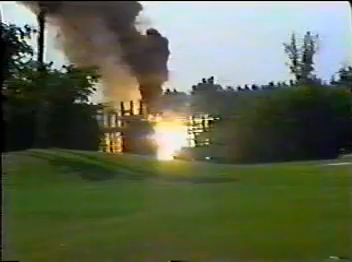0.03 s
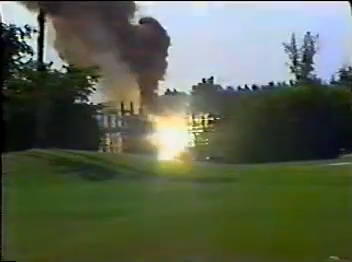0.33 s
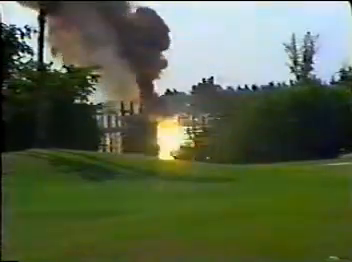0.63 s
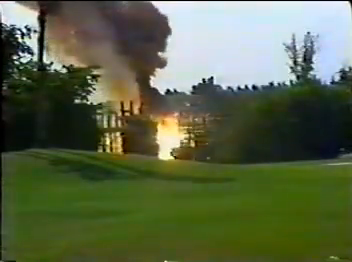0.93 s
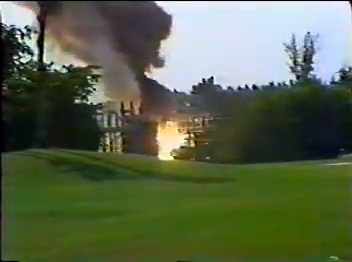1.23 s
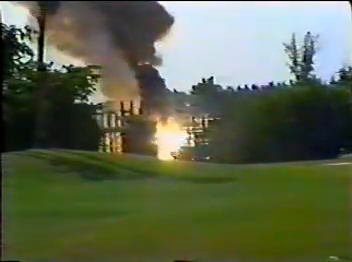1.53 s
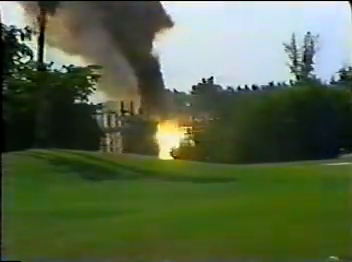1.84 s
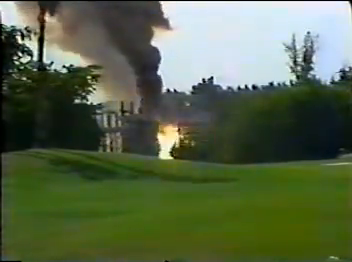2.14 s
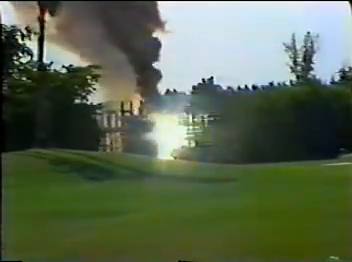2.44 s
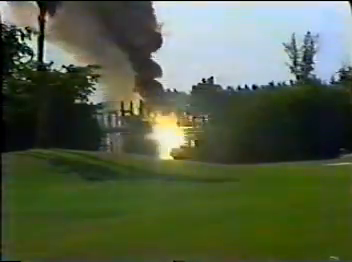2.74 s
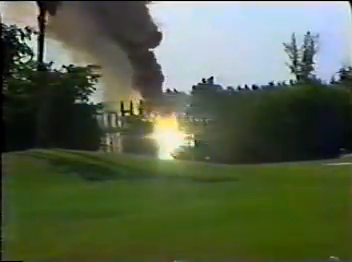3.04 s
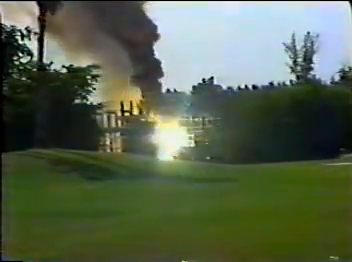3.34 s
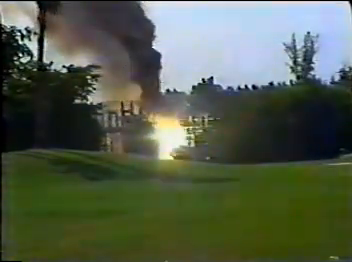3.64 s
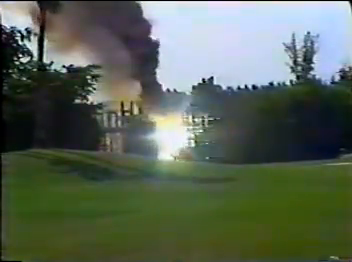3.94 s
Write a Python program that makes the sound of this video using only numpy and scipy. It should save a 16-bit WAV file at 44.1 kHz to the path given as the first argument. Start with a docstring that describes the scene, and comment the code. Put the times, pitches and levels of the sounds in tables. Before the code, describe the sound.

Loud electrical arcing buzzes and sizzles in a burning substation, with a few sparks snapping.

```python
"""A loud electric hum starts abruptly, with a ragged roar and sizzle that pulse along with it.
It is a power arc burning in a substation across a lawn, striking twice in every mains cycle.
Hot gas rumbles underneath, a few sparks snap, and whenever the arc flares the hum sags.
A fast limiter holds the peaks down over a faint hiss, and the sound cuts out once with a click."""
import sys
import numpy as np
from scipy import signal
from scipy.fft import rfft, irfft, next_fast_len
from scipy.io import wavfile
from scipy.ndimage import uniform_filter1d, minimum_filter1d, map_coordinates

SR = 44100
rng = np.random.default_rng(int(sys.argv[2]) if len(sys.argv) > 2 else 0)


def int16_out(signal):
    """Quantize to a 16-bit WAV file."""
    q = np.round(np.clip(np.atleast_2d(signal).T, -1, 1) * 32767)
    wavfile.write(sys.argv[1], SR, q.astype(np.int16))


N = 176400

# How strong each noise is from bass to treble: frequency_hz, relative_db
HISS_SPECTRUM = [(100, -14), (1000, -21), (2200, 11), (4000, 0), (8000, -12.5), (12200, -12),
                 (13000, -36.5)]
RUMBLE_SPECTRUM = [(20, -29), (45, -21), (65, -15.5), (85, 2.5), (125, -3), (155, -1), (182, -1), (210, -3),
                   (250, -8.5), (320, -9.5), (450, -15), (700, -26.5), (1500, -73)]
SPARK_SPECTRUM = [(500, -13), (2000, -2.5), (4500, -1), (7000, -2.5), (9500, -21.5), (12500, -29.5),
                  (13500, -46)]
SIZZLE_SPECTRUM = [(1200, -26.5), (2200, 0), (2700, -0.5), (3300, -4), (4200, -3), (5200, -10.5),
                   (6500, -15.5), (8000, -23.5), (10000, -32), (12300, -51), (13200, -79)]
ROAR_SPECTRUM = [(150, -26), (350, -3.5), (500, 0.5), (700, -0.5), (1000, 0), (1600, -1), (2300, -6),
                 (3000, -11.5), (5000, -33.5), (9000, -70)]
# How hard the hot gas churns: time_s, relative_db
GAS_CHURN = [(0.09, -29.5), (0.54, -33.5), (0.83, -33.5), (0.86, -20), (1.42, -35.5), (1.44, -19.5),
             (1.48, -33.5), (1.56, -20.5), (1.61, -29), (1.74, -24), (1.77, -28), (1.82, -31), (1.88, -42),
             (1.94, -28), (2.07, -33), (2.14, -25.5), (2.26, -46.5), (2.29, -24), (2.68, -24.5),
             (2.77, -24.5), (3.07, -25), (3.12, -40), (3.27, -30), (3.29, -46), (3.37, -15), (3.4, -36.5),
             (3.51, -19.5), (3.64, -28.5), (3.69, -19), (3.85, -34), (3.92, -15.5), (4.0, -19.5)]
# Snapping sparks: start_s, strength_db, decay_s (time to fall by 60 dB)
SPARK_SNAPS = [(1.205, -18.5, 0.01), (2.206, -25, 0.0088), (2.463, -31, .01), (2.8558, -17, 0.024),
               (2.865, -47, .008), (2.9634, -16.5, 0.0083)]
# Sudden spits of the arc: start_s, boost_db
ARC_SPITS = [(0.474, 12), (1.009, 6.5), (1.44, 1), (1.622, 2), (2.848, 7.5), (3.155, 8.5), (3.341, 3.5),
             (3.575, -0.5), (3.829, 14), (3.882, 3.5), (3.945, 4)]
# Flares of the arc: middle_s, hum_sag_db, width_s
ARC_FLARES = [(.21, 2.5, 0.043), (.27, 4.5, 0.017), (.395, 1.5, 0.047), (.57, 2, 0.036), (.714, 15, 0.013),
              (.91, 3.5, 0.08), (1.043, 13, 0.017), (1.13, 0.5, 0.027), (1.561, 5.5, 0.041),
              (1.72, 1.5, 0.028), (1.825, 4.5, 0.022), (1.982, 2.5, 0.031), (2.125, 3, 0.023),
              (2.304, 2.5, 0.018), (2.399, 3.9, .03), (2.544, 6, .032), (2.685, 15.5, 0.031),
              (2.853, 3, 0.046), (2.943, 10, 0.017), (3.068, 1.5, 0.034), (3.372, 7.5, 0.025),
              (3.501, 14, 0.04), (3.597, 15, 0.022), (3.697, 11, 0.026), (3.906, 4.5, 0.049),
              (3.96, 4.5, 0.065), (3.995, 13, .02)]
# Rise and fall of the arc's noise: time_s, roar_relative_db, sizzle_relative_db
NOISE_LEVELS = [(0.09, -33.5, -37.5), (0.25, -27.5, -34.5), (0.35, -39, -45), (0.37, -29, -36.5),
                (0.51, -40.5, -42), (0.56, -29.5, -35.5), (0.63, -41.5, -49), (0.71, -32, -40),
                (0.74, -40, -46.5), (0.91, -31, -34), (1.05, -32, -38), (1.07, -40.5, -45.5),
                (1.13, -31, -33.5), (1.29, -39, -44.5), (1.36, -30.5, -37.5), (1.4, -36, -42.5),
                (1.43, -35, -39), (1.44, -26.5, -30.5), (1.46, -35.5, -43), (1.49, -37.5, -45.5),
                (1.56, -27, -36), (1.65, -37, -46), (1.71, -28.5, -36), (1.74, -36.5, -43.5),
                (2.02, -31.5, -44), (2.04, -45, -50), (2.1, -32, -41), (2.25, -38.5, -46.5),
                (2.3, -31.5, -40), (2.35, -33.5, -46.5), (2.43, -32.5, -39), (2.45, -40, -43.5),
                (2.53, -28.5, -33.5), (2.58, -35.5, -44), (2.69, -32, -37.5), (2.71, -33.5, -41),
                (2.84, -32, -39), (2.86, -32.5, -36.5), (2.9, -35.5, -39.5), (2.94, -33.5, -38.5),
                (3.0, -39.5, -43), (3.08, -27.5, -33.5), (3.11, -40, -46), (3.19, -31, -39),
                (3.21, -37, -43), (3.26, -28, -37.5), (3.27, -35.5, -39.5), (3.37, -27.5, -34.5),
                (3.41, -34, -39), (3.5, -29.5, -34.5), (3.56, -35.5, -41.5), (3.6, -28, -38.5),
                (3.62, -31.5, -37), (3.63, -33, -44), (3.72, -31, -38), (3.76, -37.5, -39),
                (3.78, -31, -34), (3.87, -42, -42), (3.88, -30.5, -40), (4.0, -25, -32.5)]
# Rise and fall of the tone an octave above the hum: time_s, relative_db
OCTAVE_LEVELS = [(0.09, -30.5), (0.6, -25), (0.64, -36), (0.71, -21), (0.74, -32), (0.88, -22.5),
                 (1.3, -33), (1.35, -24), (1.45, -31), (1.48, -44), (1.55, -23.5), (2.02, -26.5),
                 (2.82, -18), (3.04, -34), (3.07, -22.5), (3.13, -50), (3.19, -30), (3.31, -32),
                 (3.37, -24.5), (3.53, -41), (3.59, -19), (3.63, -29), (3.86, -38), (3.89, -18),
                 (3.97, -33.5), (4.0, -16)]
# The hum's higher tones: pitch_multiple, level_db (relative to its lowest tone)
HUM_OVERTONES = [(4, -34.5), (6, -42), (7, -38), (8, -40)]

STRIKE_HZ = 120  # twice the mains rate
BURST_LEAD_RAD = .5  # shifts the noise bursts ahead of the hum's crests
HUM_DB, OCTAVE_DB, THIRD_DB, OCTAVE_LAG_RAD = -12.5, -1.73, -20.5, 0.88
RUMBLE_DB, THROB_DB, ROAR_DB, SIZZLE_DB, BUZZ_DB = -24.5, -5, -1.5, -0.27, -4.5
HISS_DB, CEILING_DB, CLICK_DB = -53, -7.2, -9.5
START_S, FADE_S, DROPOUT_S, DROPOUT_LENGTH_S = .0835, .0032, 1.5712, .0012


def amp(db):
    """Turn decibels into a number to multiply by."""
    return 10 ** (np.asarray(db) / 20)


def unit(x):
    """Scale to an average (rms) level of 1."""
    return x / np.sqrt(np.mean(x ** 2) + 1e-20)


def clock():
    """Time of every sample, in seconds."""
    return np.arange(N) / SR


def curves(rows):
    """Join a table's points with lines: one curve for each column after the time."""
    times, *columns = np.transpose(rows)
    return [np.interp(clock(), times, column) for column in columns]


def wobble(rate):
    """A smooth random curve through `rate` points a second."""
    return map_coordinates(rng.standard_normal(8192), [clock() * rate], mode="wrap")


def filtered(x, response):
    """Turn each frequency up or down by response(hz)."""
    size = next_fast_len(N + SR // 4)
    return irfft(rfft(x, size) * response(np.fft.rfftfreq(size, 1 / SR)), size)[..., :N]


def coloured(x, spectrum):
    """Shape x with a spectrum table, then scale it to level 1."""
    points_hz, db = np.transpose(spectrum)
    return unit(filtered(x, lambda hz: amp(np.interp(np.log(hz + 1), np.log(points_hz), db))))


def hiss():
    """A faint steady hiss, nearly the same in both channels."""
    noise = rng.standard_normal(N) + amp(-10.5) * rng.standard_normal((2, N))
    return amp(HISS_DB) * coloured(noise, HISS_SPECTRUM)


def rumble(mains, lumps_db, wander_rad):
    """Hot gas churns in low puffs; alternate strikes then differ, adding a throb at 1.5 times the hum."""
    churn_db, = curves(GAS_CHURN)
    swell_db = 0.49 * (churn_db - churn_db.mean()) + lumps_db * wobble(14)
    throb = np.sqrt(2) * amp(churn_db + THROB_DB) * np.cos(1.5 * mains + wander_rad * wobble(12))
    return amp(RUMBLE_DB + swell_db) * coloured(rng.standard_normal(N), RUMBLE_SPECTRUM) + throb


def sparks(rise_s):
    """Sparks snap: bright noise that rises fast and dies away."""
    envelope = np.zeros(N)
    for start_s, db, decay_s in SPARK_SNAPS:
        age = np.maximum(clock() - start_s, 0)
        envelope += amp(db - 60 * age / decay_s) * (1 - np.exp(-age / rise_s))
    return envelope * coloured(rng.standard_normal(N), SPARK_SPECTRUM)


def spits(decay_s):
    """Gain of the arc's noise: it jumps at each spit and falls back."""
    t = clock()
    return amp(sum(db * (t > start) * np.exp(-np.abs(t - start) / decay_s) for start, db in ARC_SPITS))


def flares():
    """How far the hum sags, in dB: a bell shape for each flare."""
    t = clock()
    return sum(db * .5 ** ((2 * (t - middle) / width) ** 2) for middle, db, width in ARC_FLARES)


def bursts(phase, strike_db, between_db, sputter_db, grain_db):
    """Gain of the arc's noise: a sputtering burst at each strike and a weaker one between."""
    early = phase + BURST_LEAD_RAD
    uneven_db = sputter_db * np.tanh(2 * wobble(80)) + grain_db * np.tanh(2 * wobble(420))
    return unit(amp(strike_db * np.cos(early) + between_db * np.cos(2 * early) + uneven_db))


def crackle(spread_db):
    """Noise whose tiny grains differ in size."""
    return rng.standard_normal(N) * amp(spread_db * np.clip(rng.standard_normal(N), -3, 3))


def buzz(phase, spread_db, ring_s):
    """A sharp crack at each strike, scattered by the steel frames."""
    strikes = np.diff(np.floor((phase + BURST_LEAD_RAD) / (2 * np.pi)), prepend=0) > 0
    t = np.arange(SR // 20) / SR
    echoes = rng.standard_normal(len(t)) * amp(-60 * t / ring_s)
    cracks = strikes * amp(spread_db * wobble(120))
    return coloured(signal.fftconvolve(cracks, echoes)[:N], ROAR_SPECTRUM)


def roar_and_sizzle(mains, sag_db, jitter_rad):
    """The arc's noise pulses with the current; spits and flares lift the roar more than the sizzle."""
    roar_db, sizzle_db = curves(NOISE_LEVELS)
    phase = mains + jitter_rad * wobble(30)
    pulses = bursts(phase, strike_db=1.5, between_db=2.25, sputter_db=2.5, grain_db=4.0)
    roar = coloured(pulses * crackle(spread_db=2.5), ROAR_SPECTRUM)
    roar += amp(BUZZ_DB) * buzz(phase, spread_db=3.5, ring_s=.014)
    sizzle = coloured(pulses * crackle(spread_db=1.0), SIZZLE_SPECTRUM)
    boost = spits(decay_s=0.0062) * amp(0.29 * sag_db)
    return boost * amp(roar_db + ROAR_DB) * roar + boost ** 0.2 * amp(sizzle_db + SIZZLE_DB) * sizzle


def hum(mains, sag_db, wander_rad, overtone_wander_rad, octave_flutter_db, flutter_db):
    """The arc swells at every strike: a near-triangular wave that drifts as the arc writhes."""
    phase = mains + wander_rad * (wobble(14) + 0.68 * wobble(36))
    tone = np.cos(phase) + amp(THIRD_DB + flutter_db * wobble(20)) * np.cos(3 * phase)
    for multiple, db in HUM_OVERTONES:
        level = amp(db + flutter_db * wobble(25))
        tone -= level * np.cos(multiple * (mains - np.pi + overtone_wander_rad * wobble(18)))
    octave_db, = curves(OCTAVE_LEVELS)
    octave = amp(octave_db + OCTAVE_DB + octave_flutter_db * wobble(22))
    octave *= np.cos(2 * (mains + overtone_wander_rad * wobble(23)) + OCTAVE_LAG_RAD)
    return np.sqrt(2) * (amp(HUM_DB - sag_db) * tone + octave)  # flares leave the octave alone


def scene():
    """Hum, roar and sizzle follow the mains; the far arc reaches both channels almost equally."""
    sag_db = flares()
    mains = 2 * np.pi * STRIKE_HZ * clock()  # one full turn per strike
    noise = roar_and_sizzle(mains, sag_db, jitter_rad=.12)
    tone = hum(mains, sag_db, wander_rad=0.43, overtone_wander_rad=0.27,
               octave_flutter_db=2.53, flutter_db=0.5)
    arc = rumble(mains, lumps_db=-2.5, wander_rad=1.14) + sparks(rise_s=0.0015) + noise + tone
    return np.array([arc * amp(-.18), arc * amp(.18)])


def limiter(sound, hold_s):
    """Turn the sound down briefly wherever a peak would pass the ceiling."""
    hold = int(hold_s * SR)
    needed = np.minimum(1, amp(CEILING_DB) / (np.abs(sound).max(axis=0) + 1e-9))
    return sound * uniform_filter1d(minimum_filter1d(needed, hold), hold)


def record(dry):
    """Limit the peaks, add hiss, start abruptly, cut out once with a click and trim the top treble."""
    t, back_s = clock(), DROPOUT_S + DROPOUT_LENGTH_S
    fades = np.clip(np.minimum(t - START_S, t[-1] - t) / FADE_S, 0, 1)
    sound_on = (t < DROPOUT_S) | (t > back_s)
    click = amp(CLICK_DB) * (t > back_s) * np.exp(-np.abs(t - back_s) / 0.00027)
    sound = fades * sound_on * (limiter(dry, hold_s=.007) + hiss()) + click
    return filtered(sound, lambda hz: 1 / (1 + (hz / 14600) ** 80))


dry = scene()
out = record(dry)
int16_out(out)
```